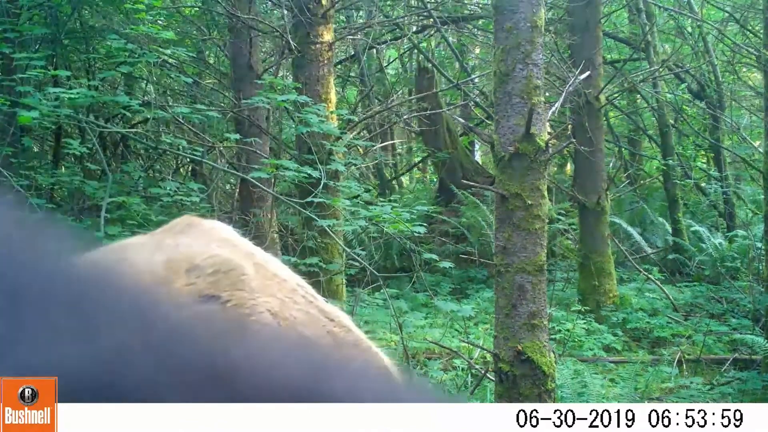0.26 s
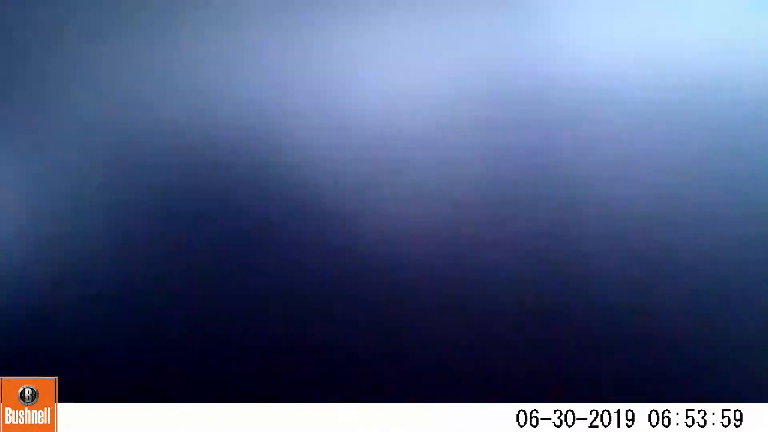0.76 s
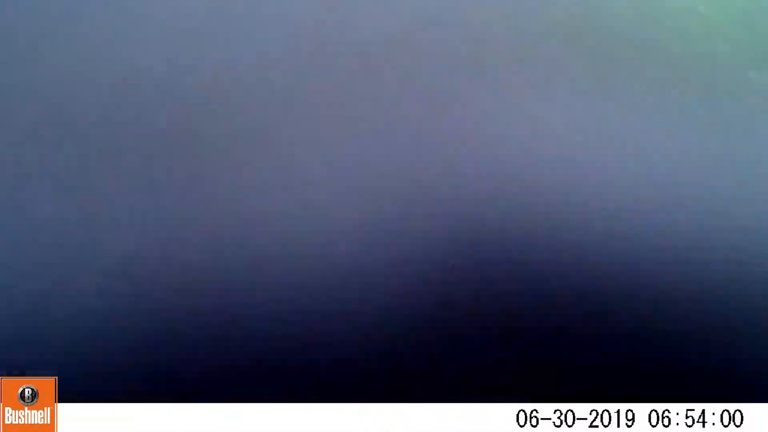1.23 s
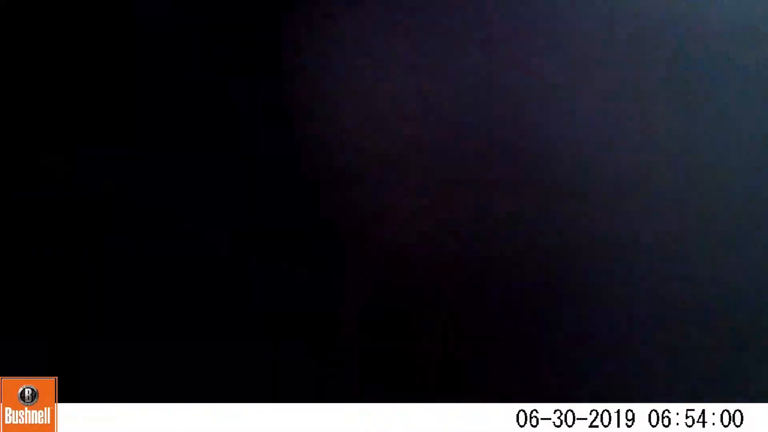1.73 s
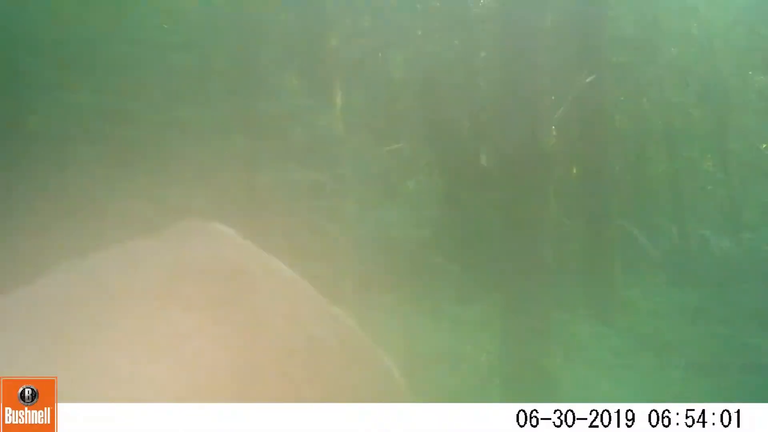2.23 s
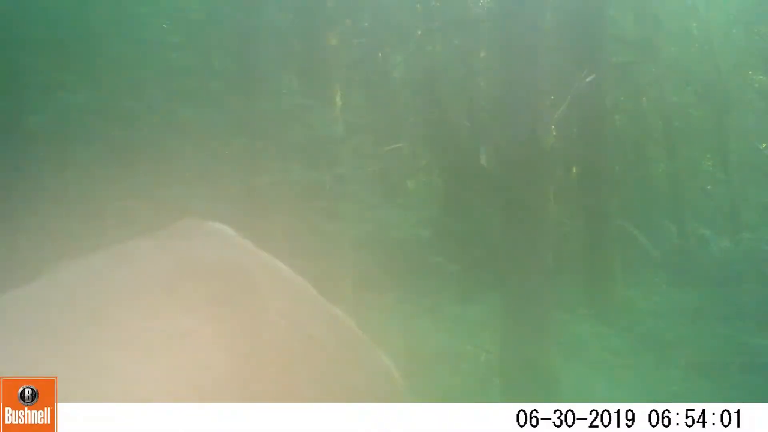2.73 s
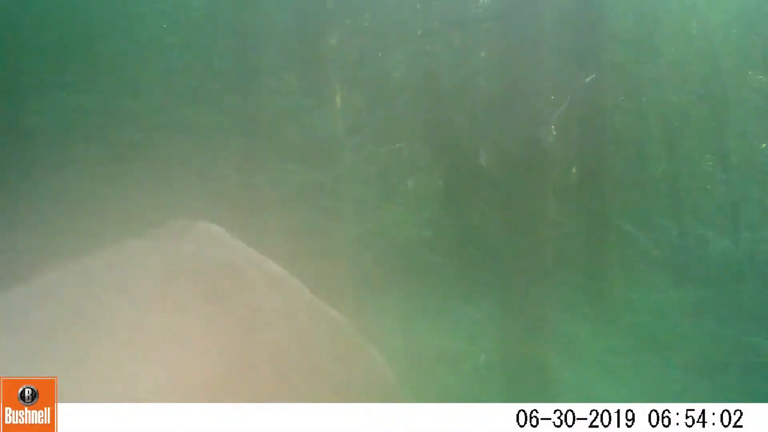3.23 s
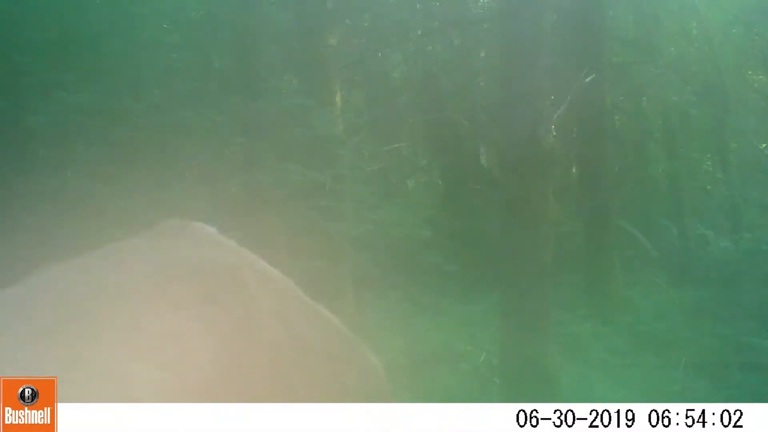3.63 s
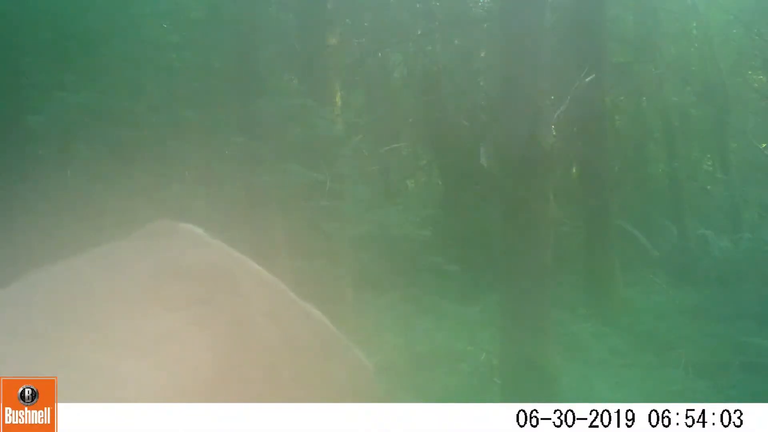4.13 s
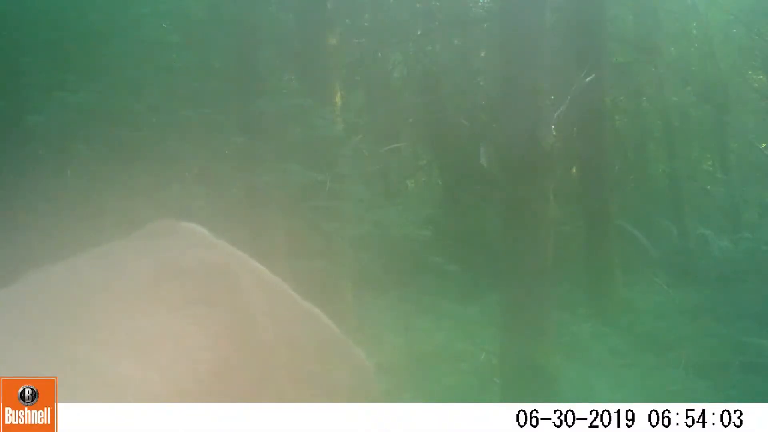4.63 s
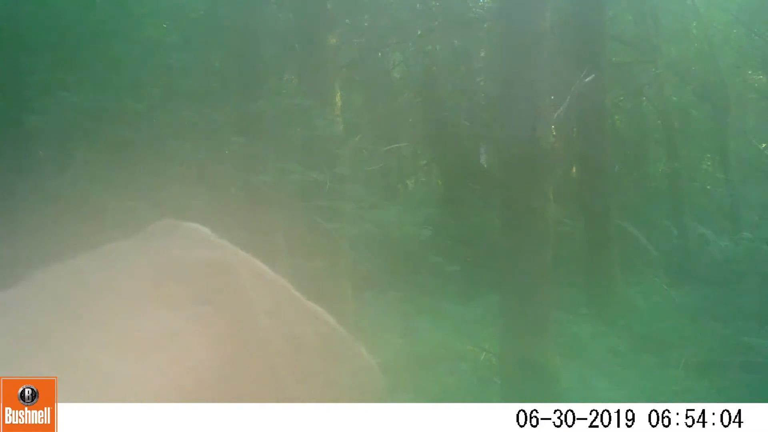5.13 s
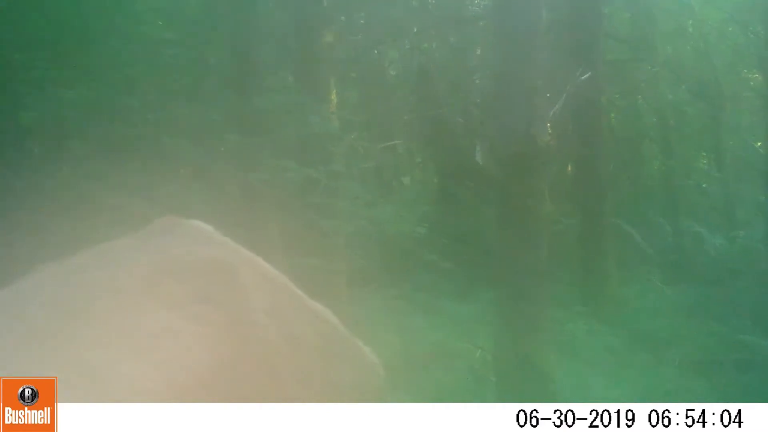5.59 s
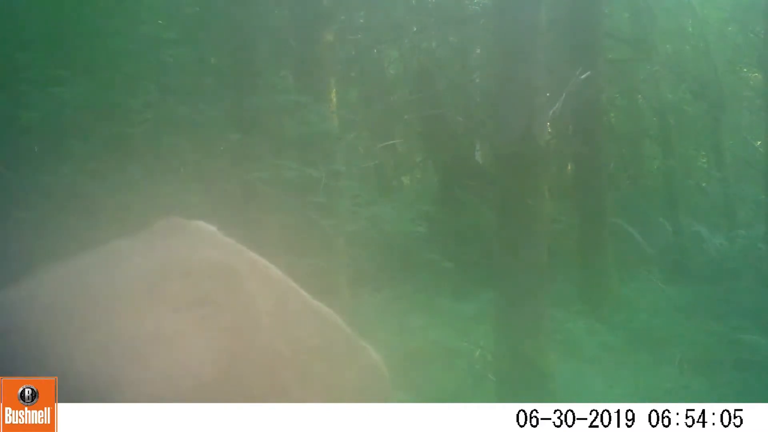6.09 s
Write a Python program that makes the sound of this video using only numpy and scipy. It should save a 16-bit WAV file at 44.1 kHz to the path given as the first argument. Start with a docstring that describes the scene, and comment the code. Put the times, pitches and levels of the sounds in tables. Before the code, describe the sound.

Extremely close, dry mono sound of an animal rubbing a small plastic housing in a quiet forest. At 0.1 s a dull thump starts a low dragging rumble, with fur hissing in strokes until about 1 s. Small ticks come around 0.6 s, a plastic knock and faint squeak near 0.75 s, and a hard, overloaded clack at 0.95 s. At 1.23 s a heavy shove thumps, scrapes and distorts in a quick double hit. Soft brushing fades by 2.4 s, leaving low air and hiss, with one barely audible tap at 3.5 s. From 4.3 to 5 s a puff of air rumbles and hisses, bursting with a snap near 4.77 s. A sharp knock at 5.34 s leads to dry ticks and short squeaks, the loudest at 5.63 s. Fur hisses again from 5.75 s, ending in a crackling, knocking flurry at 6.2-6.35 s.

```python
"""Fur hisses over plastic right at the microphone, with ticks, knocks, thumps and a few squeaks in a quiet forest.
An elk is nuzzling a trail camera. Fur, skin and air are coloured noise under drawn strokes; the knocks ring
the modes of the housing, ticks, snaps and thumps are damped swings, and the squeaks are wobbling tones.
A puff of air from the muzzle buffets the microphone, and the loudest contacts overload it."""
import sys
import numpy as np
from scipy import signal
from scipy.fft import rfft, irfft
from scipy.io import wavfile
from scipy.ndimage import uniform_filter1d

SR = 44100
rng = np.random.default_rng(int(sys.argv[2]) if len(sys.argv) > 2 else 0)


def master(y):
    """Save y as 16-bit WAV."""
    cut = np.clip(np.atleast_2d(y).T, -1, 1)
    pcm = np.round(cut * 32767)  # scale
    wavfile.write(sys.argv[1], SR, pcm.astype(np.int16))


N = 280035
T, HZ = np.arange(N) / SR, np.fft.rfftfreq(N, 1 / SR)


def amp(db):
    """Turns decibels into a gain."""
    return 10 ** (np.asarray(db) / 20)


def unit(x):
    """Scales a signal to rms 1."""
    return x / np.sqrt(np.mean(x ** 2) + 1e-20)


def read(points):
    """Draws a spectrum in dB through its points, straight over log frequency."""
    f, db = np.transpose(points)
    return np.interp(np.log(HZ + 1), np.log(f), db)


def add(mix, s, sound):
    """Lays a sound into the mix at s seconds."""
    part = mix[round(s * SR):][:len(sound)]
    part += sound[:len(part)]


def colour(x, db):
    """Filters x by a spectrum in dB, to rms 1."""
    return unit(irfft(rfft(x) * amp(db), N))


def noise():
    """White noise of rms 1."""
    return rng.standard_normal(N)


def wander(rate_hz):
    """Smooth random drift of rms 1, mostly slower than rate_hz."""
    return unit(irfft(rfft(noise()) * np.exp(-(HZ / rate_hz) ** 2), N))


def friction(slips_per_s, spread_db, smooth, clump_db, clump_hz):
    """Countless tiny slips of random size over smooth noise; their level drifts, so they come in clumps."""
    happens = rng.random(N) < slips_per_s / SR
    size = amp(spread_db * np.minimum(rng.exponential(1, N), 4))
    slips = noise() * happens * size
    return (unit(slips) + smooth * noise()) * amp(clump_db * wander(clump_hz))


def patchy(x, depth_db, count=7):
    """The shifting contact lifts and damps narrow bands for a few hundredths of a second; count is in 3 ms frames."""
    z = signal.stft(x, nperseg=512, noverlap=384)[2]
    patches = rng.standard_normal(z.shape[::-1]).T
    patches = uniform_filter1d(patches, size=4, axis=0)  # blur over frequency
    patches = uniform_filter1d(patches, size=count, axis=1)  # blur over time
    z = z * amp(depth_db * unit(patches))
    return unit(signal.istft(z, nperseg=512, noverlap=384)[1][:N])


def swells(rows):
    """Gain of strokes that rise to a peak and fall away along a rounded arch; overlaps add in power."""
    edge_db, arch_power = 12, 1.96  # edge_db down one rise before the peak and one fall after it
    power = np.zeros(N)
    for s, db, rise, fall in rows:
        away = np.clip(np.maximum((s - T) / rise, (T - s) / fall), 0, 6)
        power += amp(db - edge_db * away ** arch_power) ** 2
    return np.sqrt(power)


def forest():
    """A low wash of air over the hiss of the microphone, its level flickering slightly."""
    # forest air and microphone hiss together: f/Hz, relative level per Hz/dB
    floor = [(12, -45), (20, 1), (76, -1), (103, -6.5), (129, -5.5), (289, -10.5), (404, -13), (465, -14.5),
             (505, -15), (1040, -23.5), (1770, -28), (1980, -28.5), (15500, -41.5)]
    level_db = -35.5
    return amp(level_db) * colour(noise(), read(floor)) * amp(0.49 * wander(32))


def fur():
    """Hairs hiss over the port and ring its cavity; the treble follows how closely they cover it. Some catch and crackle."""
    # colour of the hiss before the port: f/Hz, relative level per Hz/dB
    fur_colour = [(300, -40), (900, -6.5), (2500, -10), (4000, -2), (5200, -15), (8500, -7.5),
                  (12000, -11.5), (15500, -18)]
    # resonances of the microphone port: f/Hz, width/Hz, lift/dB
    port = [(1710, 77, 15), (2380, 210, 4.8), (3460, 1350, 11.4), (6770, 580, 10.2), (9200, 340, 6.8),
            (11400, 910, 4.2), (14200, 1300, 9.4)]
    # strokes over the port, before the trims: peak t/s, level/dB, rise/s, fall/s, treble against that level/dB
    strokes = [(0.11, -48.5, 0.084, 0.07, 2), (0.40, -31, 0.096, 0.098, -10.5),
               (0.67, -29.5, 0.26, 0.052, -10.5), (0.79, -40, 0.15, 0.086, -12),
               (1.05, -36.5, 0.062, 0.11, -10), (1.59, -40.5, 0.2, 0.19, -4.5),
               (1.93, -40.5, 0.33, 0.2, -7.5), (2.38, -52, 0.6, 0.1, -0.5), (5.77, -29.5, 0.13, 0.078, -10),
               (5.864, -30.5, 0.054, 0.052, -6), (6.02, -36, 0.12, 0.1, -4.5),
               (6.312, -21, 0.035, 0.029, -6)]
    # short rasps of hair catching on the case: peak t/s, level/dB, rise/s, fall/s
    catches = [(0.09, -46, .004, 0.021), (5.743, -23.5, .0015, 0.0034), (6.2, -25.5, .004, .012),
               (6.232, -25, 0.019, 0.02)]
    # colour of the crackle: f/Hz, relative level per Hz/dB
    crackle_colour = [(400, -10), (1000, -4), (2200, 3.5), (4700, 0.5), (6000, -3), (15000, -45)]
    body_trim_db, treble_trim_db, stroke_crackle_db, split_hz = 3.0, 9.5, -6, 5600

    spectrum = read(fur_colour)
    for hz, width, lift_db in port:
        spectrum = spectrum + lift_db / (1 + (2 * (HZ - hz) / width) ** 2)
    drive = friction(slips_per_s=2300, spread_db=-2.5, smooth=2.0, clump_db=0.5, clump_hz=69.5)
    hiss = patchy(colour(drive, spectrum), depth_db=3.5, count=26)
    treble = irfft(rfft(hiss) / (1 + (split_hz / (HZ + 1)) ** 8), N)
    body = hiss - treble
    body_gain = swells([row[:4] for row in strokes])
    treble_gain = swells([(s, db + treble_db, rise, fall) for s, db, rise, fall, treble_db in strokes])

    snags = friction(slips_per_s=700, spread_db=2.5, smooth=0.57, clump_db=2.5, clump_hz=120)
    crackle = colour(snags, read(crackle_colour))
    crackle_gain = swells(catches) + amp(stroke_crackle_db) * body_gain  # a little under every stroke too
    return (amp(body_trim_db) * body_gain * body + amp(treble_trim_db) * treble_gain * treble
            + crackle_gain * crackle)


def muzzle():
    """Soft skin scrapes the case with a dull rasp, and with a low rumble where it presses hard."""
    # colour of the brushing: f/Hz, relative level per Hz/dB
    brush_colour = [(150, 2.5), (500, 0), (1000, 2.5), (2000, -3), (3500, -4.5), (4500, -10), (6500, -27.5),
                    (15000, -31.5)]
    # colour of the dragging: f/Hz, relative level per Hz/dB
    drag_colour = [(30, -17), (100, 0), (200, 2.5), (400, -3.5), (700, -10), (1200, -17), (3000, -63)]
    # brushing the case, and grinding on it in the hardest shove: peak t/s, level before trim/dB, rise/s, fall/s
    brushes = [(0.095, -33.5, 0.016, 0.21), (0.40, -33.5, .4, 1), (1.24, -14.5, 0.009, 0.026),
               (1.273, -15.5, 0.018, 0.012), (5.6, -36, 0.47, 0.23), (6.232, -24, 0.05, 0.046)]
    # dragging heavily across the front: peak t/s, level before trim/dB, rise/s, fall/s
    drags = [(0.09, -15.5, 0.011, 0.014), (0.235, -14, 0.11, 0.15), (0.57, -27, 0.25, 0.12),
             (1.25, -16, 0.013, 0.035)]
    rasp_trim_db, rumble_trim_db = 2.5, -1.0

    scrape = friction(slips_per_s=1800, spread_db=-0.5, smooth=1.07, clump_db=-0.04, clump_hz=81)
    rasp = patchy(colour(scrape, read(brush_colour)), depth_db=2.2)
    press = friction(slips_per_s=900, spread_db=3.0, smooth=0.99, clump_db=2.0, clump_hz=50)
    rumble = colour(press, read(drag_colour))
    return amp(rasp_trim_db) * rasp * swells(brushes) + amp(rumble_trim_db) * rumble * swells(drags)


def puff():
    """Turbulent air pushes on the diaphragm; the big puff also hisses past the case at a steady flow."""
    # colour of the buffeting: f/Hz, relative level per Hz/dB
    puff_colour = [(10, -5.5), (26, 2.5), (52, 2), (100, -5), (180, -13.5), (400, -27.5), (1000, -38),
                   (3000, -65.5)]
    # air from the muzzle and the moving head: peak t/s, level before trim/dB, rise/s, fall/s
    gusts = [(0.26, -28, .35, .16), (0.85, -29, 0.23, 0.58), (1.9, -34, 0.94, 0.24),
             (4.48, -20, 0.068, 0.16), (4.76, -5, 0.13, 0.25), (5.9, -40.5, 1, 0.062),
             (6.27, -27, 0.15, 0.18)]
    # colour of the puff's hiss: f/Hz, relative level per Hz/dB
    jet_colour = [(300, 8), (1200, -3), (2400, -2.5), (3800, -3.5), (5000, -7), (5900, -14), (6800, -22),
                  (15000, -36)]
    buffet_trim_db, jet_db = -0.65, -35.5
    start_s, end_s, attack_s, release_s = 4.23, 5, 0.091, 0.19

    buffet = colour(noise(), read(puff_colour)) * swells(gusts)
    flow = np.clip(np.minimum((T - start_s) / attack_s, (end_s - T) / release_s), 0, 1)
    jet = flow * colour(noise(), read(jet_colour))
    return amp(buffet_trim_db) * buffet + amp(jet_db) * jet


def pulse(db, hz, rise):
    """A heavily damped swing whose envelope peaks after rise seconds."""
    t = np.arange(SR // 4) / SR
    envelope = t / rise * np.exp(1 - t / rise)
    return amp(db) * envelope * np.sin(2 * np.pi * hz * t)


def bumps():
    """Ticks and overload snaps swing for about one cycle; shoves rock the whole camera on its mount."""
    # dry ticks at the case, and the sharp snaps of overload in the hardest shove and the big puff:
    # t/s, envelope peak level/dB, f/Hz
    ticks = [(0.5878, -6, 2600), (0.617, -4, 2600), (0.6570, -12, 3000), (1.231, 2.5, 728),
             (4.7663, 0.5, 428), (4.9315, -20, 1100), (5.4206, -12.5, 1200), (5.4413, -0.5, 1100),
             (5.4590, -12, 890), (5.4755, -9, 2000), (5.5749, -8, 875), (5.611, -14, 735),
             (6.3408, -9, 3000)]
    # shoves that rock the camera: t/s, envelope peak level/dB, f/Hz, time to the peak/s
    thumps = [(0.071, -4.5, 66, 0.0032), (0.801, -14.5, 24, 0.0079), (1.032, -19, 156, 0.017),
              (1.2266, 8, 82, 0.0028), (1.235, -11.5, 159, 0.017), (1.2630, 1, 110, 0.0027),
              (1.2696, -13.5, 320, 0.0034), (1.466, -19, 142, 0.0039), (5.339, -15, 66.5, 0.0047),
              (6.189, -16.5, 24.6, 0.019), (6.326, -14.5, 44, 0.0063)]
    tick_rise_cycles = 0.24

    out = np.zeros(N)
    for s, db, hz in ticks:
        add(out, s, -pulse(db, hz, tick_rise_cycles / hz))  # starts the opposite way to a shove
    for s, db, hz, rise in thumps:
        add(out, s, pulse(db, hz, rise))
    return out


def knocks():
    """Each blow rings the housing modes near its own colour, with a crunch as the contact grinds."""
    # modes of the plastic housing: f/Hz, relative level/dB, t60 before the ring factor/s
    housing = [(865, 1.5, 0.046), (1153, 3, 0.02), (1364, -16.5, 0.053), (1504, -2.5, 0.013),
               (1713, -5, 0.022), (2080, -1, 0.003), (2323, -5, 0.028), (2810, 1, 0.012), (3195, -3, 0.02),
               (3490, -14, 0.069), (3836, -1, 0.012), (4850, -1.5, 0.018), (7470, -4, 0.019),
               (10000, -28.5, 0.014)]
    # blows: t/s, peak level of the ringing/dB, most excited f/Hz, ring as a factor on t60
    blows = [(0.7421, 2, 2900, 1.55), (0.9282, -14.5, 2460, 2.8), (0.9419, 4.5, 2600, 0.47),
             (0.9561, 19.5, 2940, 0.26), (0.9603, 0, 2050, 1.13), (1.0216, -6, 3430, 0.53),
             (1.2384, -2, 1500, 0.77), (1.2622, 4.5, 2770, 0.55), (1.2706, 1, 1520, 1.46),
             (3.534, -27.5, 1190, 0.69), (4.765, -14.5, 1480, 0.74), (5.342, 8, 2300, 0.67),
             (6.2153, -11.5, 2200, 0.36), (6.2341, -6, 1160, 0.38), (6.235, -4.5, 3620, 0.76),
             (6.244, 2, 1340, 0.17), (6.2489, -0.5, 2780, 0.81), (6.3252, -5.5, 1890, 0.53)]
    # colour of the crunch: f/Hz, relative level per Hz/dB
    grit_colour = [(200, 11), (1000, -4.5), (3400, 6.5), (4500, 0.0), (6000, -4.5), (11000, -10.0), (16000, -51)]
    spread_octaves, crunch, crunch_t60 = 0.98, 0.23, .026  # crunch: gain against the ringing's peak

    out, t = np.zeros(N), np.arange(SR // 10) / SR
    hz, mode_db, t60 = np.transpose(housing)[:, :, None]
    grit = colour(noise(), read(grit_colour))
    for s, db, spot_hz, ring in blows:
        weight = amp(mode_db) / (1 + (np.log2(hz / spot_hz) / spread_octaves * 2) ** 2)
        weight = weight * rng.choice([-1, 1], hz.shape)  # each spot pushes some modes in and others out
        loaded_hz = hz * (1 + 0.017 * rng.standard_normal(hz.shape))  # the touch detunes the shell
        decay = amp(-60 * t / (t60 * ring))
        body = (weight * decay * np.sin(2 * np.pi * loaded_hz * t)).sum(0)
        grind = crunch * grit[round(s * SR):][:len(t)]
        body = body[:len(grind)] / abs(body).max()
        grind = grind * amp(-60 * t[:len(grind)] / (crunch_t60 * ring))
        add(out, s, amp(db) * (body + grind))
    return out


def squeak():
    """The nose sticks and slips on the plastic; a firm grip is louder and steadier, and bends the pitch."""
    # slips: start t/s, length/s, level at full grip/dB, f/Hz, sag of the pitch at full grip (negative rises)/share,
    # rms pitch jitter at full grip/share
    slips = [(0.767, 0.098, -37.5, 4070, -0.13, .08), (5.481, 0.062, -23.5, 3200, 0.052, .15),
             (5.507, 0.033, -25, 2100, .13, .04), (5.628, .026, -3, 2424, 0.084, .014),
             (5.647, 0.028, -4, 3730, 0.12, 0.017), (5.662, .02, -17, 3370, 0.02, 0.061)]
    overtones_db = [-22, -31, -34]  # second to fourth harmonic, against the fundamental
    grip_skew, grip_loudness, grip_sag_power = 1.13, 0.87, 2.55
    loose_jitter, shimmer_db = 0.033, 3.6  # extra pitch jitter as a loose share; rms flicker of the level

    out = np.zeros(N)
    for s, length, db, hz, sag, jitter in slips:
        progress = np.clip((T - s) / length, 0, 1)
        grip = abs(np.sin(np.pi * progress ** grip_skew))  # builds and lets go along an arch
        wobble = (jitter + loose_jitter * (1 - grip)) * wander(840)
        pitch = hz * (1 - sag * grip ** grip_sag_power) * (1 + wobble)
        phase = 2 * np.pi * np.cumsum(pitch) / SR
        overtones = sum(amp(level) * np.sin(k * phase) for k, level in enumerate(overtones_db, 2))
        gain = grip ** grip_loudness * amp(db + shimmer_db * wander(520))
        out += gain * (np.sin(phase) + overtones)
    return out


def scene():
    """The nuzzling and the forest, summed to one channel."""
    return (forest() + fur() + muzzle() + puff() + bumps() + knocks() + squeak())[None]


def record(dry):
    """The preamplifier flattens loud peaks, with a little give above its limit; then the band limit."""
    overload, band_limit_hz = 0.49, 15850  # overload: amplitude
    flat = dry / (1 + (dry / overload) ** 10) ** (1 / 10)
    clipped = flat + .09 * np.tanh(dry - flat)
    lowpass = signal.firwin(511, band_limit_hz, window=("kaiser", 9), fs=SR)
    return signal.oaconvolve(clipped, lowpass[None], "same")


dry = scene()
out = record(dry)
master(out)
```